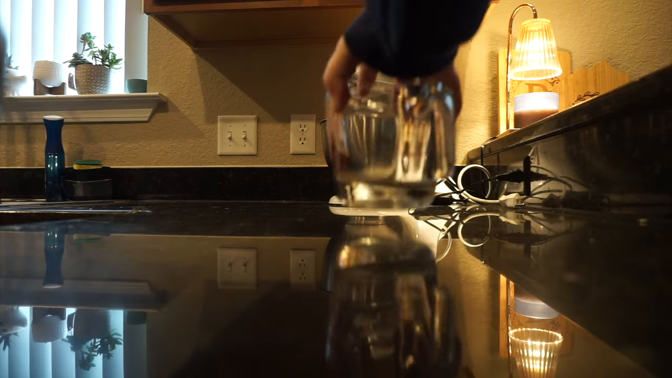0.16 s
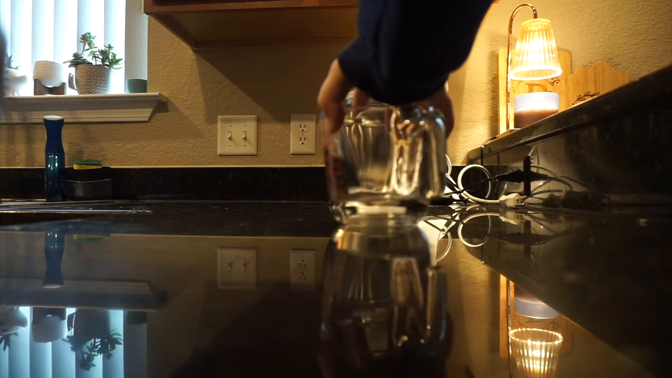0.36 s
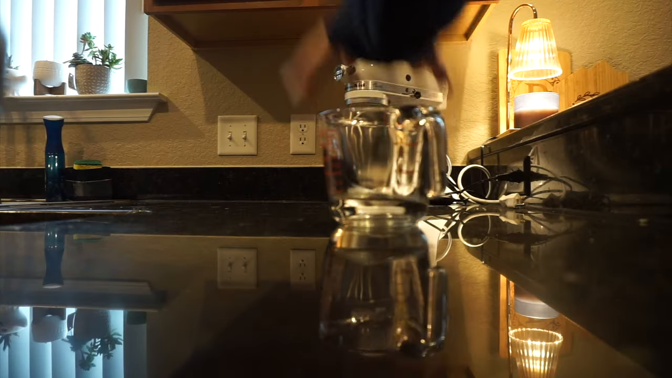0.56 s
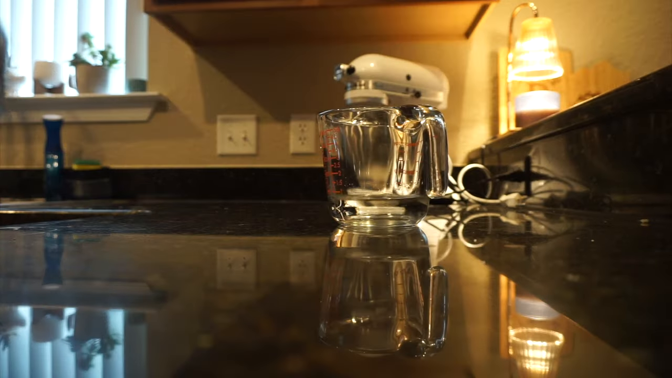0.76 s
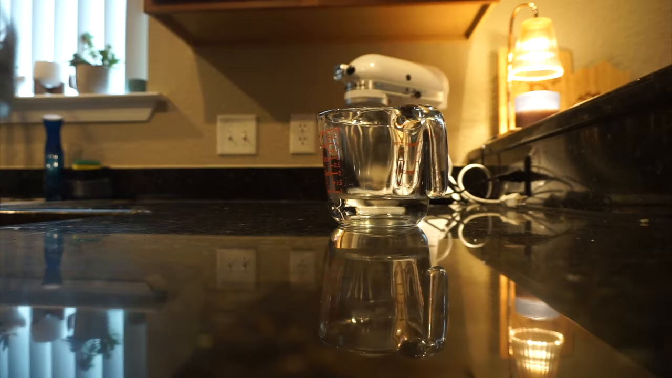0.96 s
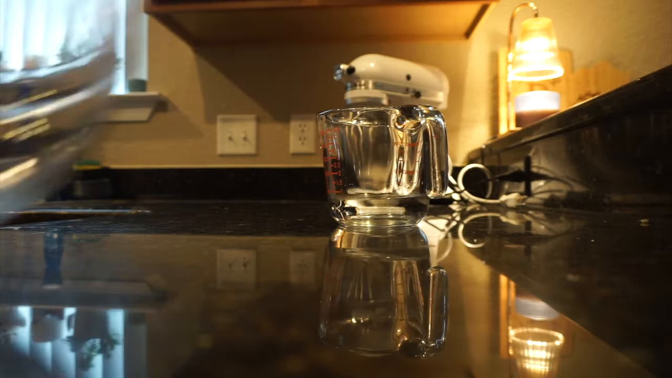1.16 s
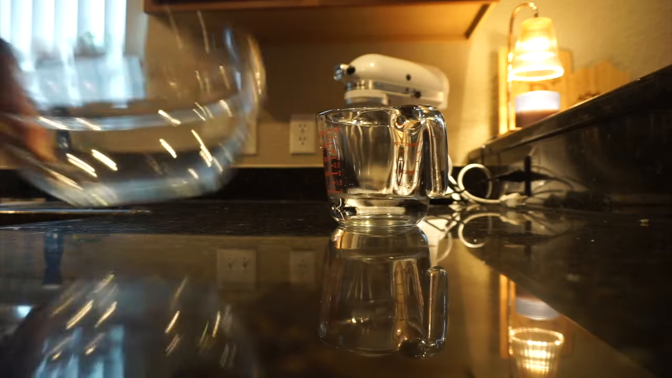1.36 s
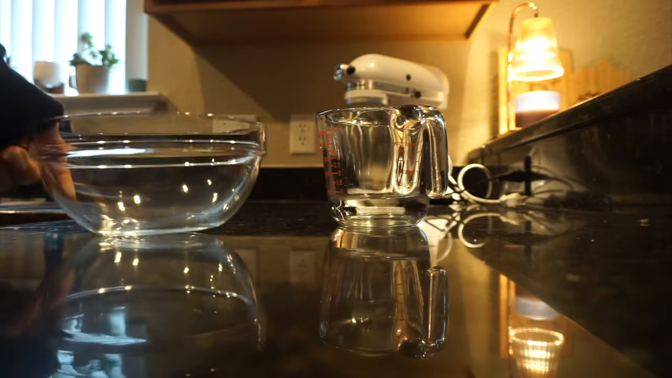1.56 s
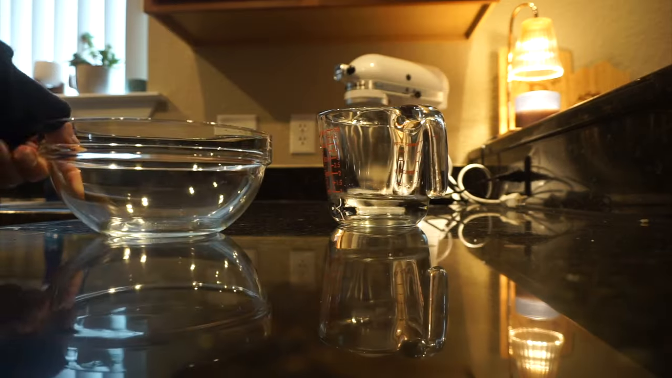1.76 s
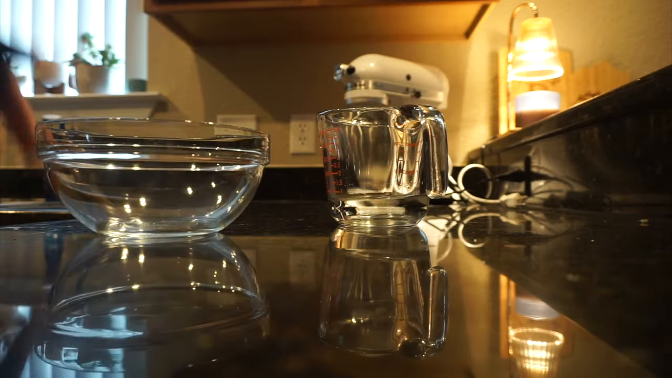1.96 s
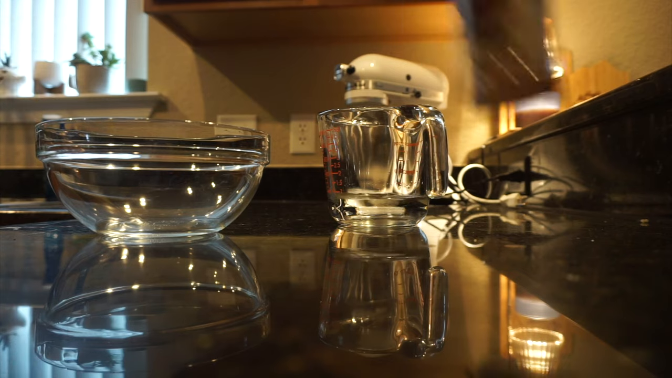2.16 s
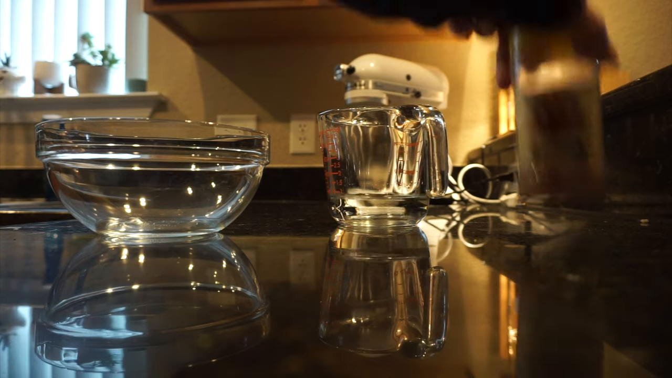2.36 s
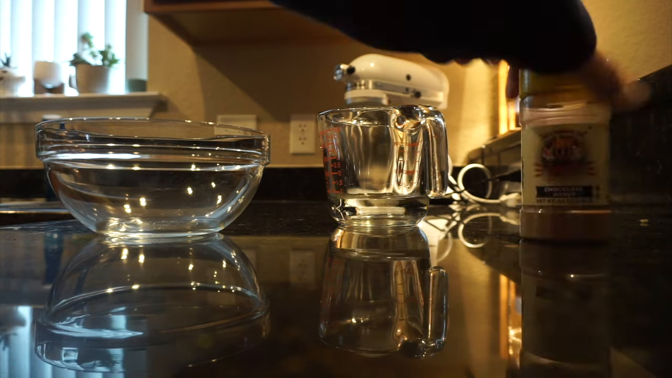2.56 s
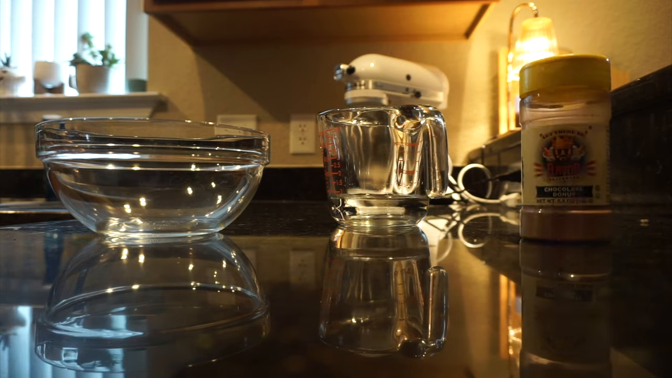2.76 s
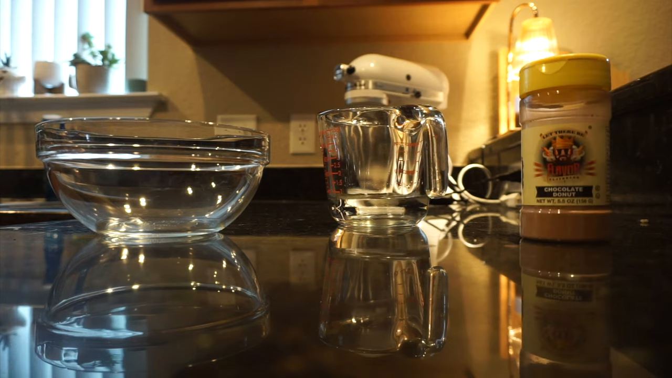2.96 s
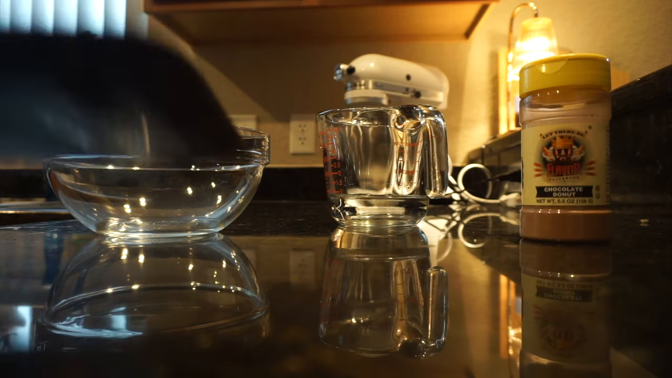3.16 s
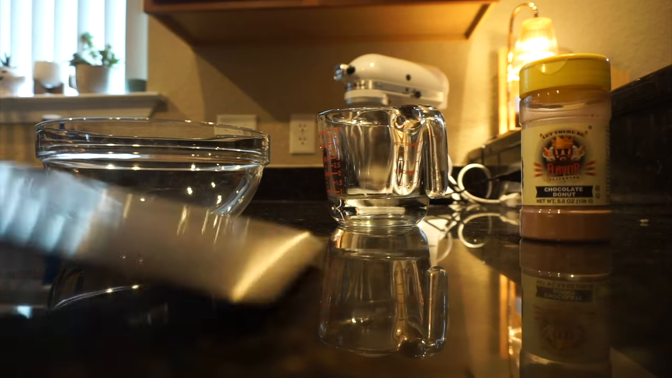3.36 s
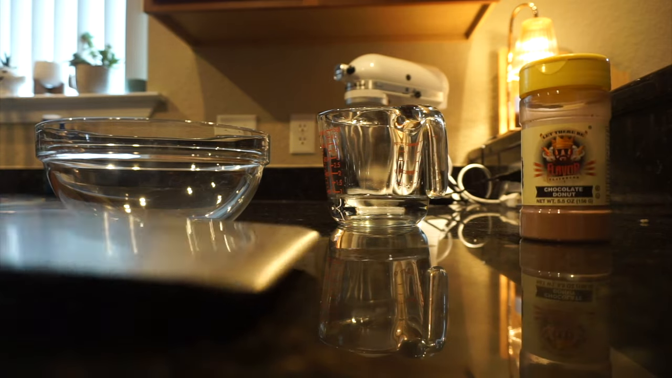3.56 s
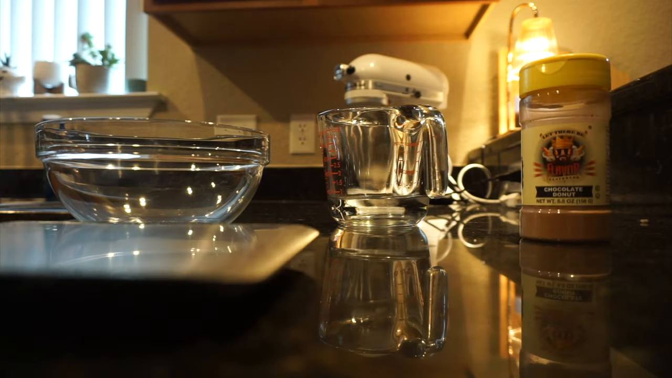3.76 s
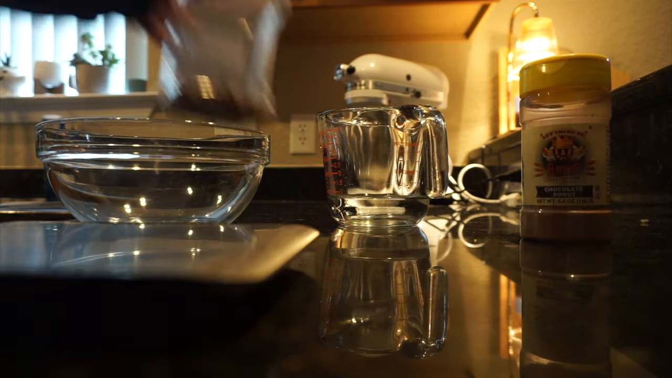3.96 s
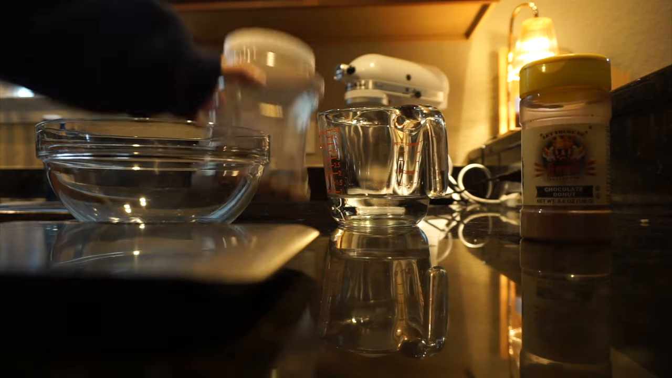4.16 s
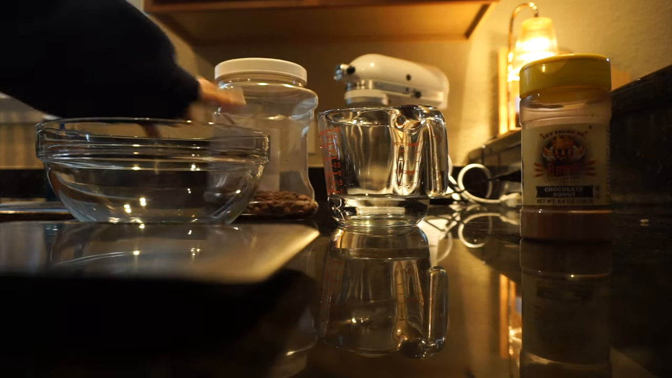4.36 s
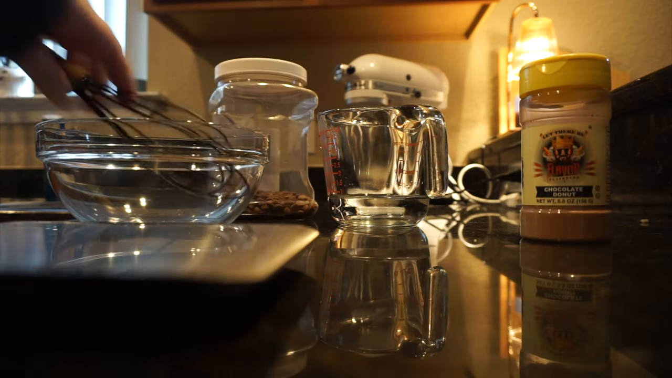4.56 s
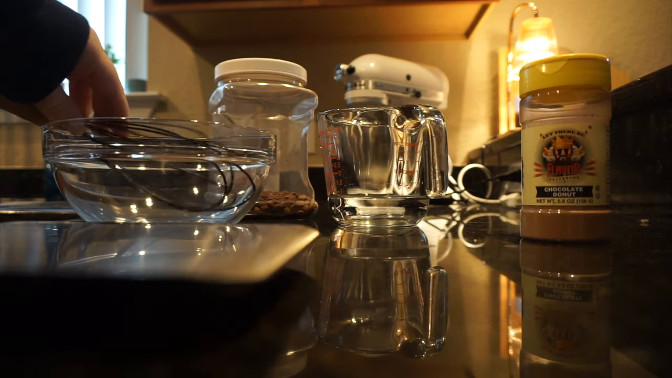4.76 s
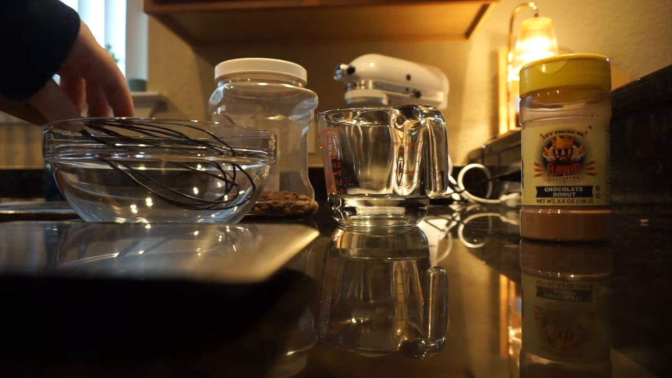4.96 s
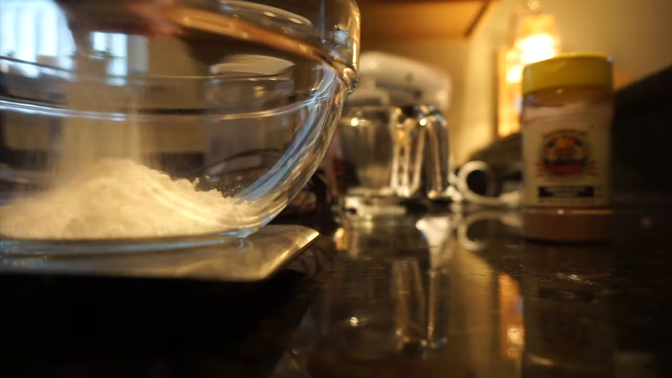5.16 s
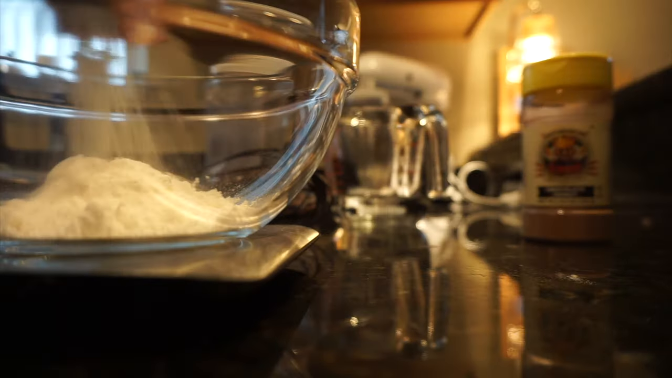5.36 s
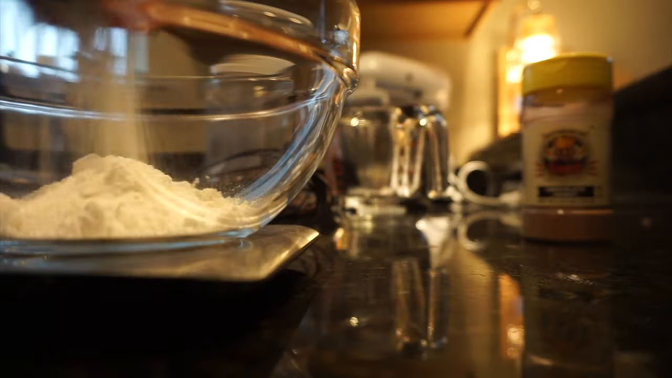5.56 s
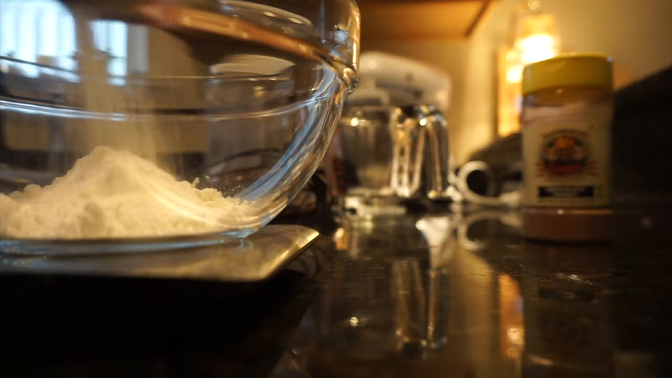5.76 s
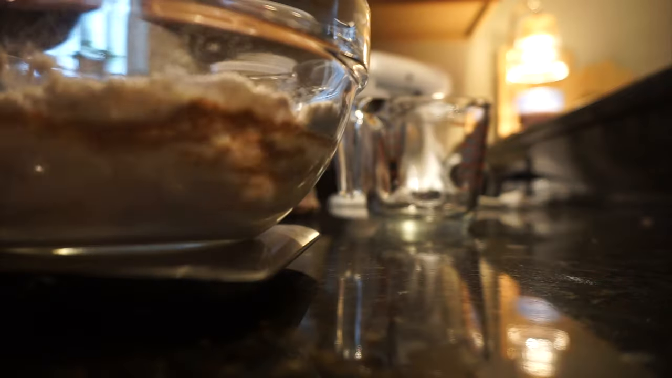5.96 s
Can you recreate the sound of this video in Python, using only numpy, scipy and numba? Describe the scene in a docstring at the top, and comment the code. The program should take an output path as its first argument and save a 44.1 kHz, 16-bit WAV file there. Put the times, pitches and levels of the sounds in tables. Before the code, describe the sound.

Glassware and jars are set on a countertop with ringing clinks and knocks, followed by a whisk clattering and a bag rustling.

```python
"""A glass cup, a glass bowl, a plastic jar, a flat scale and a jar of seeds are set on a stone counter;
each impact excites the damped modes of the body. The bowl scrapes, a sleeve brushes, seeds clatter,
a whisk drops into the bowl, then flour is shaken from a crinkling bag. An appliance hums throughout.
The kitchen is heard in nine shots, and every cut chops the reverberation of the room."""
import sys
import numpy as np
from scipy import signal
from scipy.fft import rfft, irfft
from scipy.io import wavfile
from scipy.ndimage import uniform_filter1d
from numba import njit

SR = 44100
rng = np.random.default_rng(int(sys.argv[2]) if len(sys.argv) > 2 else 0)


def pcm_store(signal):
    """Save signal as 16-bit PCM."""
    levels = np.round(np.clip(np.atleast_2d(signal), -1, 1) * 32767)
    wavfile.write(sys.argv[1], SR, levels.astype(np.int16).T)


N = 264511

# borders of the shots: time_s
CUTS = [0, 0.807, 1.128, 2.129, 3.05, 3.878, 4.486, 5.076, 5.929, 6.1]
# one row a shot: left_lead_us, left_over_right_db, room_db
SHOTS = [(27.8, 5.5, 0.9), (30.5, 13, -4.5), (38.4, 2, 0.74), (20.8, 4, -3.5), (62, 6.5, -7.5),
         (23, 4, -3.5), (19.4, 4.5, -2.1), (29.3, 2.7, -7), (41, 5, -1)]
# one row a shot: low_hum_db, mid_hum_start_db, mid_hum_end_db, high_hum_db, rumble_db, air_db
BACKGROUND_LEVELS = [(-62.5, -51.5, -51.5, -65, -62, -64), (-72, -59, -64, -61, -60.5, -64.5),
                     (-64.5, -64.5, -75.5, -62.5, -61.5, -66), (-57, -61.5, -51.5, -69, -60.5, -63),
                     (-55, -55.5, -52, -73, -59.5, -63.5), (-60, -50, -49, -64.5, -62, -59.5),
                     (-62.5, -53.5, -48.5, -74, -60.5, -62), (-86, -80, -78, -65, -60, -51),
                     (-65, -49, -43, -53, -57.5, -54)]
# partials of the hum: pitch_hz
HUM_HZ = [26, 52, 107]

# impacts: start_s, level_db, contact_ms, ring_db (absent for the plastic jar, which has no long ring)
CUP_BLOWS = [(0.342, -10.5, 0.098, -7), (0.3775, -11, 0.91, 11.5), (0.394, -10.5, 0.32, 9),
             (0.403, -11, 0.5, -31), (0.412, -18, 0.84, -1), (0.4255, -11.5, 0.23, 3.5),
             (0.433, -13, 0.32, -1), (0.444, -13, 0.6, -8), (0.477, -22, 0.6, -2)]
BOWL_RIM_BLOWS = [(0.8988, -48.5, 0.12, 2), (0.992, -44.5, 0.089, -15), (4.598, -39, 1, -0.5),
                  (4.719, -10, 0.26, -10.5), (4.758, -16, 0.069, 1)]
BOWL_FOOT_BLOWS = [(0.956, -49, 0.65, -10), (0.975, -40.5, 1, -1), (0.999, -35.5, 1, -17),
                   (1.064, -46, 0.94, -12), (1.071, -40.5, 0.95, -12), (1.583, -8.5, 0.14, -10),
                   (1.775, -8.5, 0.42, -6), (1.787, -5.5, 0.35, -0.5), (1.802, -8, 0.49, -2),
                   (1.808, -11, 0.38, -6), (1.816, -12.5, 0.16, -12), (1.833, -23, 0.28, -10.5),
                   (1.851, -18.5, 0.88, -12), (4.637, -16, 1, -10), (4.675, -14, 0.96, -15),
                   (4.708, -12, 0.83, 0), (4.742, -7.5, 0.95, 0.5), (4.747, -5.5, 0.3, -14),
                   (4.764, -14.5, 0.21, -31), (4.776, -13, 0.8, 2), (4.789, -10, 0.49, -6)]
JAR_BLOWS = [(2.467, -11, 0.42), (2.477, -16.5, 0.54), (2.569, -35.5, 0.92)]
SCALE_BLOWS = [(3.284, -32.5, 0.15, -21), (3.323, -47, 0.24, -9), (3.365, -21.5, 0.5, -1),
               (3.369, -9, 0.18, 10.5), (3.401, -16, 0.067, 11), (3.411, -24, 0.091, -10),
               (3.422, -6.5, 0.32, -9), (3.452, -7, 0.38, -1), (3.486, -21.5, 0.3, 3),
               (3.627, -14, 0.078, 3), (3.631, -3.5, 0.11, 8.5), (3.659, -8, 0.19, 18),
               (3.867, -36, 0.064, -15)]
SEED_JAR_BLOWS = [(3.963, -36, 0.16, -19), (4.037, -48, 0.3, -19), (4.126, -48, 0.29, -20),
                  (4.229, -8, 0.56, 7.5), (4.24, -12, 1.2, 5.5), (4.264, -12, 0.84, -4),
                  (4.322, -4, 1, -10), (4.347, -14.5, 0.6, -11), (4.377, -19.5, 1.4, 9)]
# modes, the knock below a t60 of 0.1 s and the long ring from there up: pitch_hz, level_db, t60_s
CUP_MODES = [(197, -5.5, 0.03), (660, 4, 0.021), (830, 4, 0.026), (1650, -9.5, 0.047), (2080, -10, 0.045),
             (3050, -20, 0.012), (4320, -16, 0.027), (1264, -16, 0.56), (1264, -10.5, 0.15),
             (1600, -33, 0.4), (3560, -18, 0.105), (4220, -13, 0.037), (7640, -18, 0.043),
             (11050, -15, 0.083)]
JAR_MODES = [(108, -4.5, 0.081), (179.7, 2.5, 0.075), (387, -26.5, 0.0093), (568, -7, 0.028),
             (820, -12, 0.013), (1330, -6.5, 0.015), (2220, -10, 0.031), (2810, -7.5, 0.025)]
SCALE_MODES = [(170, -8, 0.041), (305, -16, 0.092), (2360, 0.5, 0.015), (704, -7, 0.099),
               (1136, 2.5, 0.016), (1346, -1.5, 0.026), (1983, -1.5, 0.018), (5500, -11, 0.015),
               (90, -19, 0.31), (115, -18.5, 0.13)]
SEED_JAR_MODES = [(187, -7.5, 0.061), (246.5, -1, 0.05), (286, -2, 0.061), (602, 0, 0.031),
                  (1160, -10, 0.012), (297.3, -8.5, 0.15)]
# modes of the bowl struck at rim or foot, where close pairs beat: pitch_hz
RIM_HZ = [700, 1720, 3080, 1651, 3042, 4650, 6450, 8500, 10500]
FOOT_HZ = [200, 870, 1000, 1900, 387, 873, 997, 2051, 4157, 4188, 4222, 4270, 7117, 7150, 7197, 9674, 9730,
           10780]
# strength and decay of those modes: level_db, t60_s
RIM_DECAY = [(0.5, 0.043), (8.5, 0.021), (-4, 0.064), (1.5, 0.53), (-20, 0.064), (-32, .05), (-9, 0.044),
             (-13, 0.073), (-2, 0.095)]
FOOT_DECAY = [(-14.5, 0.025), (5.5, 0.03), (2.5, 0.014), (3, 0.0086), (-23.5, 0.28), (-34, 0.52), (-29, .3),
              (-18.5, 0.25), (-18.5, 0.59), (-11, 0.24), (-13.5, .2), (-24, 0.053), (-6, 0.38),
              (-15.5, 0.17), (-10, 0.067), (-12.5, 0.34), (-15.5, .15), (-15, 0.28)]
RIM_MODES = [(hz, *decay) for hz, decay in zip(RIM_HZ, RIM_DECAY)]
FOOT_MODES = [(hz, *decay) for hz, decay in zip(FOOT_HZ, FOOT_DECAY)]

# drags of the bowl: start_s, length_s, level_db
SLIDES = [(0.922, 0.14, -57), (1.593, 0.18, -33)]
# strokes of the sleeve: peak_s, level_db, fall_db_per_s
SLEEVE_STROKES = [(1.136, -61.5, 26), (2.168, -58.5, 112)]
# tumbles of the seeds: peak_s, level_db
SEED_TUMBLES = [(4.266, -25.5), (4.338, -30.5)]
# loud snaps of the bag: start_s, level_db, pitch_hz
BAG_SNAPS = [(5.0787, -28, 2580), (5.1138, -30, 3080), (5.1312, -28, 1930), (5.1685, -27.5, 2580),
             (5.206, -32, 2510), (5.2274, -33, 2430), (5.2666, -30, 2000), (5.2754, -27.5, 2360),
             (5.33, -28, 3160), (5.3542, -26.5, 2360), (5.3657, -33, 1570), (5.412, -26, 2450),
             (5.496, -34, 2300), (5.551, -30.5, 3050), (5.6067, -28, 2660), (5.656, -26.5, 2900),
             (5.6917, -32, 2480), (5.7175, -32.5, 2640), (5.7724, -35, 2480), (5.7819, -23.5, 2750),
             (5.8375, -27.5, 2650), (5.8515, -23.5, 2240)]
# shakes of the bag: peak_s, flour_level_db
BAG_SHAKES = [(5.082, -39.5), (5.125, -44), (5.175, -47.5), (5.212, -38.5), (5.276, -43.5), (5.352, -36),
              (5.41, -43.5), (5.503, -39), (5.56, -42), (5.632, -38), (5.69, -48.5), (5.783, -39),
              (5.848, -43.5), (5.9, -46.5)]

# noise spectra (a crack is the noise of an impact): frequency_hz, relative_density_db
RUMBLE_SPECTRUM = [(12, -42), (20, -18), (58, -12), (86, -14.5), (119, -15.5), (151, -15), (577, -36),
                   (700, -32), (910, -52.5), (1540, -120)]
AIR_SPECTRUM = [(180, -14.5), (300, -5), (426, -5.5), (467, -10.5), (605, -5.5), (1730, -12), (2740, -13),
                (2960, -16), (10700, -16.5), (11500, -29), (15000, -42), (22000, -120)]
CUP_CRACK = [(150, -44), (250, -10.5), (860, 2.5), (1160, -13.5), (1300, -0.5), (1450, -4.5), (2050, -4),
             (11000, -63), (14300, -92), (22000, -120)]
BOWL_CRACK = [(150, -28), (400, -11), (900, 16), (1500, 2.5), (2500, -3.5), (4000, -16), (7000, -35),
              (11000, -32)]
SLEEVE_SPECTRA = [
    [(700, 1), (1500, -3.5), (2800, -2), (4500, -6), (7000, -13), (11000, -36.5)],
    [(700, -17.5), (1800, -1.5), (3000, -6), (6000, -11), (8500, 2.5), (11000, -10)],
]  # one for each stroke
JAR_CRACK = [(150, -24), (250, -4.5), (502, -10), (543, -7.5), (1090, -22.5), (2190, -17), (3750, -32.5),
             (11000, -29), (14300, -72), (22000, -120)]
SCALE_CRACK = [(150, -66), (250, -13.5), (552, -40), (689, -5.5), (945, -9.5), (1430, -14), (3350, -28),
               (11000, -27.5), (14300, -71), (22000, -120)]
SEED_JAR_CRACK = [(150, -14), (300, -3), (700, -12.5), (1500, -13), (3000, -22), (6000, -13.5),
                  (11000, -16)]
SEED_SPECTRUM = [(240, -39.5), (400, -24), (778, 1.5), (1030, -10.5), (1840, -7.5), (2030, -8.5),
                 (4790, -19), (11000, -27), (14300, -58), (22000, -120)]
RUSTLE_SPECTRUM = [(710, -34), (1200, -16), (1450, -4), (1770, -1.5), (2510, 2), (4300, -8.5), (6520, -6),
                   (9700, -4.5), (11000, -3), (11500, -27), (15000, -53), (22000, -120)]
FLOUR_SPECTRUM = [(59, -27), (100, -14), (129, -16), (287, 0.5), (350, -1.5), (525, -3.5), (807, 5.5),
                  (1130, -20), (1440, -6.5), (1600, -12), (2080, -54), (3520, -120)]

# reverberation time: frequency_hz, t60_s
ROOM_T60 = [(60, 0.16), (250, 0.59), (700, 0.69), (1500, 0.65), (3000, 0.6), (6000, 0.46), (11000, 0.23)]
# colour of the reverberation: frequency_hz, gain_db
ROOM_GAIN = [(60, -9.5), (250, -4.5), (700, -7), (1500, -4), (3000, -1.5), (6000, -4.5), (11000, -2.5)]
# likeness of left and right in diffuse sound: frequency_hz, coherence
BACKGROUND_COHERENCE = [(60, 1.0), (170, 0.95), (490, 0.3), (1420, -0.032), (4080, -0.13), (11700, 0.28)]
ROOM_COHERENCE = [(60, 1), (200, 1), (500, 0.87), (1000, 0.47), (2500, 0.06), (6000, .03), (11000, .02)]


def gain_of(db):
    """Amplitude ratio of a level in decibels."""
    return 10 ** (np.asarray(db) / 20)


def unit_rms(x):
    """Normalisation to an rms of 1."""
    return x / np.sqrt(np.mean(x ** 2) + 1e-20)


def curve_at(points, hz):
    """Interpolation of a table on a logarithmic frequency axis."""
    table_hz, value = np.transpose(points)
    return np.interp(np.log(hz + 1), np.log(table_hz + 1), value)


def coloured(x, spectrum):
    """Spectral shaping of x, at an rms of 1."""
    hz = np.fft.rfftfreq(len(x), 1 / SR)
    return unit_rms(irfft(rfft(x) * gain_of(curve_at(spectrum, hz)), len(x)))


def diffuse_pair(a, b, coherence):
    """A diffuse field at two close points is coherent in the bass and largely incoherent in the treble."""
    alike = np.clip(curve_at(coherence, np.fft.rfftfreq(len(a), 1 / SR)), 0, 1)
    mid, side = rfft(a) * np.sqrt((1 + alike) / 2), rfft(b) * np.sqrt((1 - alike) / 2)
    return irfft(np.array([mid + side, mid - side]), len(a))


def grains(per_s, spread_db):
    """Shot noise: independent clicks of uneven size."""
    size = gain_of(spread_db * np.minimum(rng.exponential(1, N), 4))
    return size * rng.standard_normal(N) * (rng.random(N) < per_s / SR)


def swells(rows, rise_db_s, fall_db_s, hold_s=0):
    """Envelope of exponential growth, hold and decay, each swell confined to its shot."""
    t, out = np.arange(N) / SR, np.zeros(N)
    for peak_s, db in rows:
        in_shot = np.searchsorted(CUTS, t, "right") == np.searchsorted(CUTS, peak_s, "right")
        drop_db = np.maximum(rise_db_s * (peak_s - t), fall_db_s * np.maximum(t - peak_s - hold_s, 0))
        out += in_shot * gain_of(db - drop_db)
    return out


def hum_and_air():
    """Appliance partials, slowly modulated in phase and amplitude, over diffuse rumble and room air."""
    t = np.arange(N) / SR
    shot = np.searchsorted(CUTS, t, "right") - 1
    levels = uniform_filter1d(np.array(BACKGROUND_LEVELS, float)[shot], size=441, axis=0)
    low_db, start_db, end_db, high_db, rumble_db, air_db = levels.T
    progress = np.interp(t, CUTS, np.arange(len(CUTS))) - shot
    mid_db = uniform_filter1d(start_db + (end_db - start_db) * progress, size=441)
    out = 0
    for hz, db in zip(HUM_HZ, (low_db, mid_db, high_db)):
        waver = unit_rms(uniform_filter1d(uniform_filter1d(rng.standard_normal(N), 4000), 4000))
        partial = np.sin(2 * np.pi * hz * t + 0.21 * waver) * (1 + 0.16 * waver)
        out = out + np.sqrt(2) * gain_of(db) * partial
    for db, spectrum in ((rumble_db, RUMBLE_SPECTRUM), (air_db, AIR_SPECTRUM)):
        noises = [coloured(white, spectrum) for white in rng.standard_normal((2, N))]
        out = out + gain_of(db) * diffuse_pair(*noises, BACKGROUND_COHERENCE)
    return out


def modal_ring(modes, contact_s, ring_db, uneven_db=0):
    """Free vibration of damped modes; a longer contact drives the high ones less and builds up slower."""
    t, out = np.arange(SR // 2 + SR // 4) / SR, 0
    for (hz, db, t60), (scatter, phase) in zip(modes, rng.standard_normal((len(modes), 2))):
        drive = gain_of(db + uneven_db * scatter + ring_db * (t60 >= 0.1)) / (1 + (hz * contact_s) ** 2)
        out = out + drive * np.sin(2 * np.pi * hz * t + phase) * gain_of(-60 * t / t60)
    return out * (1 - np.exp(-t / (0.93 * contact_s)))


def impacts(rows, modes, spectrum, crack_s, crack_db, tick_db):
    """Impact excitation: a tick if the contact is hard, a broadband crack, and modes until the cut."""
    out, t = np.zeros(N + SR), np.arange(2048) / SR
    onset_delay_s = 0.0012  # each impact sounds just after its listed time
    for start_s, db, contact_ms, *ring_db in rows:
        contact_s = np.clip(contact_ms, 0.03, 3) / 1000
        sound = modal_ring(modes, contact_s, sum(ring_db))
        pole = np.exp(-1 / (0.15 * contact_s * SR))  # the contact acts as a low-pass filter
        crack = signal.lfilter([1 - pole], [1, -pole], coloured(rng.standard_normal(2048), spectrum))
        crack = crack * np.exp(-t / crack_s) * (1 - np.exp(-t / (1.6 * contact_s)))
        tick = rng.standard_normal(2048) * np.exp(-t / 0.0018) * gain_of(tick_db - 67 * contact_ms)
        sound = sound / abs(sound).max()
        sound[:2048] += gain_of(crack_db) * crack / abs(crack).max() + tick
        next_cut_s = min(cut for cut in CUTS if cut > start_s)
        sound = sound[:round((next_cut_s - start_s) * SR)] / abs(sound).max()
        out[round((start_s + onset_delay_s) * SR):][:len(sound)] += gain_of(db) * sound
    return out[:N]


def bowl_slide(ramp_s=0.014):
    """Forced vibration: stone grit scrapes under the dragged bowl and keeps its modes going."""
    t = np.arange(N) / SR
    pressure = sum(gain_of(db) * np.clip(np.minimum(t - start_s, start_s + length_s - t) / ramp_s, 0, 1)
                   for start_s, length_s, db in SLIDES)
    grit = grains(per_s=5400, spread_db=3.2) * pressure
    response = modal_ring(FOOT_MODES, contact_s=0.00024, ring_db=1.5, uneven_db=4)
    ringing = signal.fftconvolve(grit, response)[:N]
    ringing[round(CUTS[3] * SR):] = 0
    scrape = coloured(grit, BOWL_CRACK)
    return (gain_of(-6.5) * unit_rms(ringing) + gain_of(-1.5) * scrape) * np.sqrt(np.mean(pressure ** 2))


def sleeve_brush():
    """Friction noise of cloth swells and fades as the arm moves."""
    return sum(swells([(peak_s, db)], rise_db_s=900, fall_db_s=fall)
               * coloured(rng.standard_normal(N), spectrum)
               for (peak_s, db, fall), spectrum in zip(SLEEVE_STROKES, SLEEVE_SPECTRA))


def seed_clatter():
    """After a jolt, collisions of hard seeds with the plastic wall add up to shot noise."""
    collisions = coloured(grains(per_s=5000, spread_db=1), SEED_SPECTRUM)
    return swells(SEED_TUMBLES, rise_db_s=811, fall_db_s=192) * collisions


def film_snap(hz):
    """Transient of the bag's film: a heavily damped tone and a burst of noise."""
    t = np.arange(800) / SR
    tone = np.sin(2 * np.pi * hz * t) * np.exp(-t / 0.0015)
    return tone + gain_of(-0.5) * rng.standard_normal(800) * np.exp(-t / 0.0018)


def flour_bag(small_snaps_per_s=45):
    """Superposition of loud snaps with the small snaps, rustle and flour thuds that follow the shakes."""
    snaps = np.zeros(N + 800)
    for start_s, db, hz in BAG_SNAPS:
        snaps[round(start_s * SR):][:800] += gain_of(db) * film_snap(hz)
    shake = swells(BAG_SHAKES, rise_db_s=410, fall_db_s=391, hold_s=0.008)
    motion = shake / shake.max()
    onsets = rng.random(N) < small_snaps_per_s / SR
    small_snaps = onsets * gain_of(-35.5 + 6.1 * rng.standard_normal(N)) * np.sqrt(motion)
    snaps[:N] += signal.oaconvolve(small_snaps, film_snap(hz=2450))[:N]
    rustle_gain = gain_of(2) * shake.max() * motion ** 2.07  # deeper dips between shakes
    rustle = rustle_gain * coloured(grains(per_s=6000, spread_db=4.4), RUSTLE_SPECTRUM)
    flour = shake * coloured(grains(per_s=1500, spread_db=2), FLOUR_SPECTRUM)
    return snaps[:N] + rustle + flour


def reverberation(x):
    """Convolution with sparse reflections of random sign, each band decaying at its own rate."""
    reflections = np.zeros((2, SR))
    arrivals = np.arange(260, SR - 20, 20) + rng.integers(0, 20, (2, (SR - 261) // 20))
    np.put_along_axis(reflections, arrivals, rng.choice([-1., 1.], arrivals.shape), 1)
    hz, t, bands = signal.stft(diffuse_pair(*reflections, ROOM_COHERENCE), SR, nperseg=256)
    decay = gain_of(-60 * t / curve_at(ROOM_T60, hz)[:, None])
    tail = signal.istft(bands * decay, SR, nperseg=256)[1]
    tail[:, :200] = 0
    colour = gain_of(curve_at(ROOM_GAIN, np.fft.rfftfreq(tail.shape[1], 1 / SR)))
    response = irfft(rfft(tail / np.linalg.norm(tail[0])) * colour, tail.shape[1])
    return signal.fftconvolve(x[None], response, axes=1)


def direct_sound(mid, lead_us, pan_db):
    """Direction from arrival time and level; diffraction leaves the bass equal on both sides."""
    side = np.tanh(pan_db * np.log(10) / 40) * mid
    side = signal.lfilter(*signal.butter(1, 700, "high", fs=SR), side)
    delay = np.exp(-2j * np.pi * np.fft.rfftfreq(len(mid), 1 / SR) * lead_us / 1e6)
    return np.array([mid + side, irfft(rfft(mid - side) * delay, len(mid))])


def scene():
    """Direct and reverberant fields add to the background, and both end at each cut."""
    sources = (
        impacts(CUP_BLOWS, CUP_MODES, CUP_CRACK, crack_s=0.0045, crack_db=1, tick_db=-10)
        + impacts(BOWL_FOOT_BLOWS, FOOT_MODES, BOWL_CRACK, crack_s=0.014, crack_db=-5.5, tick_db=-2.5)
        + impacts(BOWL_RIM_BLOWS, RIM_MODES, BOWL_CRACK, crack_s=0.0096, crack_db=-7, tick_db=-4)
        + impacts(JAR_BLOWS, JAR_MODES, JAR_CRACK, crack_s=0.0044, crack_db=-3.5, tick_db=11.5)
        + impacts(SCALE_BLOWS, SCALE_MODES, SCALE_CRACK, crack_s=0.01, crack_db=1.6, tick_db=5.7)
        + impacts(SEED_JAR_BLOWS, SEED_JAR_MODES, SEED_JAR_CRACK,
                  crack_s=0.007, crack_db=-6, tick_db=11.5)
        + bowl_slide() + seed_clatter() + sleeve_brush() + flour_bag())
    sources = signal.lfilter(*signal.butter(2, 75, "high", fs=SR), sources)
    t, out = np.arange(N) / SR, hum_and_air()
    for start_s, end_s, (lead_us, pan_db, room_db) in zip(CUTS, CUTS[1:], SHOTS):
        shot = slice(round(start_s * SR), min(round(end_s * SR), N))
        sound = sources[shot]
        room = gain_of(room_db) * reverberation(sound)[:, :len(sound)]
        fade = np.clip((end_s - t[shot]) / 0.01, 0, 1)
        out[:, shot] += (direct_sound(sound, lead_us, pan_db) + room) * fade
    return out


@njit
def gain_reduction(target_db, attack_s, release_s):
    """First-order relaxation towards the target: quick to turn down, slow to recover."""
    out, now_db = np.empty(len(target_db)), 0.
    for i in range(len(target_db)):
        lag_s = attack_s if target_db[i] > now_db else release_s
        now_db += (target_db[i] - now_db) / (lag_s * SR)
        out[i] = now_db
    return out


def record(dry, threshold_db=-27):
    """Compression that starts afresh in each shot, soft saturation, then two low-pass filters."""
    power_db = 10 * np.log10(abs(uniform_filter1d((dry ** 2).mean(0), 100)) + 1e-12)
    target_db = 0.27 * np.maximum(power_db - threshold_db, 0)
    shots = np.split(target_db, [round(cut * SR) for cut in CUTS[1:-1]])
    reduction_db = np.concatenate([gain_reduction(shot, attack_s=0.036, release_s=0.3) for shot in shots])
    saturated = 0.7 * np.tanh(dry / gain_of(reduction_db) / 0.7)
    dull_top = signal.firwin(151, 11120, window=("kaiser", 4), fs=SR)
    band_limit = signal.firwin(511, 12322, window=("kaiser", 9), fs=SR)
    return signal.oaconvolve(saturated, np.convolve(dull_top, band_limit)[None], "same")


dry = scene()
out = record(dry)
pcm_store(out)
```